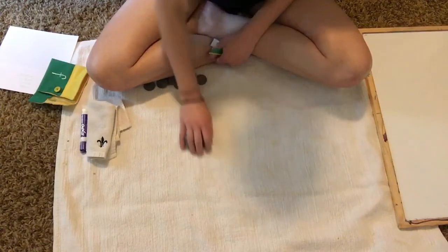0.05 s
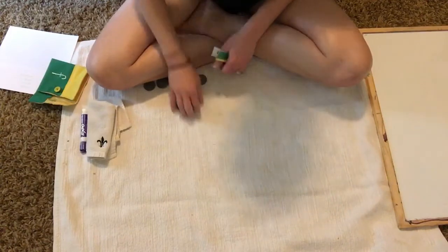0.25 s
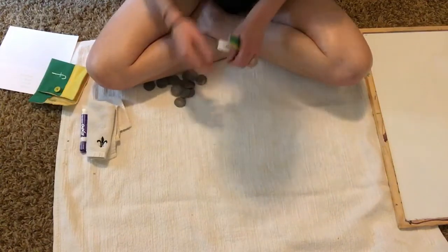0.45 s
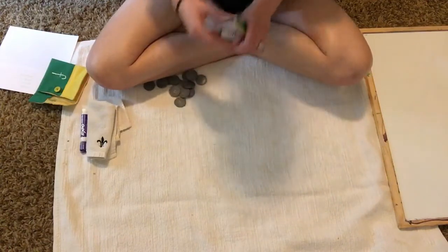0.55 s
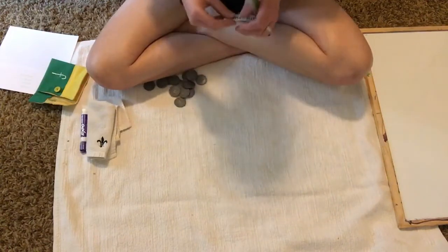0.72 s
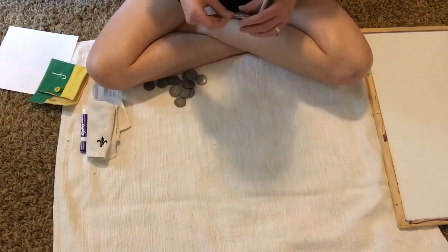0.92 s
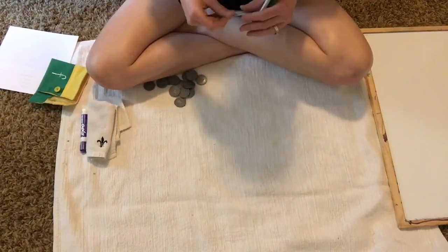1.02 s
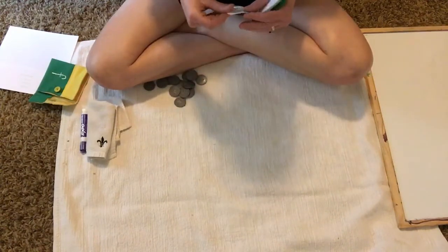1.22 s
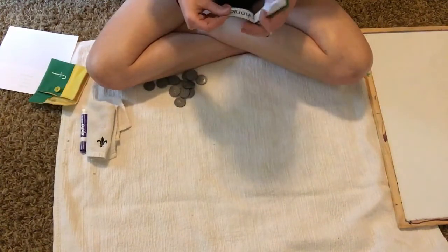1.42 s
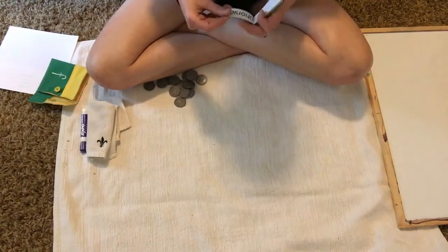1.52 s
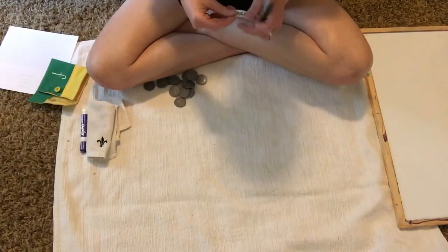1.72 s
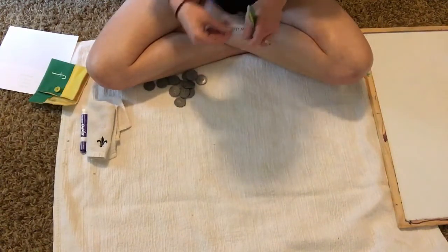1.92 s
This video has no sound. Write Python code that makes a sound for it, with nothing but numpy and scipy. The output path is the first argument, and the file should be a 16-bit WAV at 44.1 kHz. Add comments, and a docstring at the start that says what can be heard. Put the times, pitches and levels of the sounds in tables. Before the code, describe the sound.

Coins clink and jostle as a hand sweeps them across a towel, then clash into a small pile and settle. Fingers faintly slide over and tap a small paper packet in a quiet furnished room.

```python
"""Coins clink as a hand sweeps them across a towel on carpet; they clash into a small pile and settle.
Each contact clicks and rings the coins' modes, choked by neighbours and fingers. Then the fingers
slide and tap a small paper packet: its fibres hiss, its edge rasps in tiny slips, taps ring it briefly.
Hand and body bump softly, over the steady air of a quiet furnished room."""
import sys
import numpy as np
from scipy import signal
from scipy.fft import rfft, irfft, next_fast_len
from scipy.io import wavfile
from scipy.ndimage import map_coordinates

SR = 44100
rng = np.random.default_rng(int(sys.argv[2]) if len(sys.argv) > 2 else 0)


def persist_wave(psi):
    """Save psi, clipped to +-1, as 16-bit WAV."""
    counts = np.round(np.clip(psi, -1, 1) * 32767).astype(np.int16)
    wavfile.write(sys.argv[1], SR, np.atleast_2d(counts).T)


N = 85995
T = np.arange(N) / SR
RING_T = T[:SR // 3]


def amp(db):
    """Decibels to gain."""
    return 10 ** (np.asarray(db) / 20)


def unit_rms(x):
    """Scale to rms 1."""
    return x / np.sqrt(np.mean(x ** 2) + 1e-20)


def log_interp(points, hz):
    """Interpolate (Hz, value) points on a log frequency axis."""
    point_hz, values = np.transpose(points)
    return np.interp(np.log(hz + 1), np.log(point_hz + 1), values)


def filtered(x, response):
    """Apply a gain given as a function of Hz."""
    size = next_fast_len(N + SR // 4)
    return irfft(rfft(x, size) * response(np.fft.rfftfreq(size, 1 / SR)), size)[:N]


def noise(spectrum):
    """Coloured noise of rms 1."""
    return unit_rms(filtered(rng.standard_normal(N), lambda hz: amp(log_interp(spectrum, hz))))


def ramp(t, rise_s):
    """Linear rise from 0 to 1."""
    return np.clip(t / rise_s, 0, 1)


def decay(t, t60_s):
    """Silent before zero, then exponential decay."""
    return (t >= 0) * np.exp(-np.log(1000) * np.maximum(t, 0) / t60_s)


def add(out, start_s, x):
    """Mix x into out at start_s."""
    i = max(0, round(start_s * SR))
    out[i:i + len(x)] += x[:N - i]


# Cloth friction spectrum. Each row: frequency in Hz, relative level in dB.
TOWEL_SPECTRUM = [(300, 2.5), (800, -10), (1500, -2), (2500, -12), (16000, -16)]
def towel_sweep(level_db=-63.5, lift_s=0.332, fade_s=0.21):
    """The hand brushes the towel until it lifts."""
    return amp(level_db) * (1 - ramp(T - lift_s, fade_s)) * noise(TOWEL_SPECTRUM)


UPPER_HZ, RING_RISE_S = 7000, 0.000315
def ring(modes, upper_db=0, scatter_db=2.5, lower_detune=0.0075, upper_detune=0.025):
    """One blow excites damped modes, each scattered in pitch and strength."""
    hz, db, t60_s = np.transpose(modes)
    upper = hz > UPPER_HZ
    pitch, strength, polarity = rng.standard_normal((3, len(hz)))
    hz = hz * (1 + np.where(upper, upper_detune, lower_detune) * pitch)
    gain = amp(db + scatter_db * strength)
    gain = np.sign(polarity) * gain / np.linalg.norm(gain) * amp(upper_db * upper)
    tones = np.sin(2 * np.pi * hz[:, None] * RING_T) * decay(RING_T, t60_s[:, None])
    return 2 * gain @ tones * ramp(RING_T, RING_RISE_S)


# Coin modes. Each row: frequency in Hz, relative level in dB, unchoked t60 in seconds.
COIN_RESONANCES = [(4700, -4.5, .06), (4930, -2, .08), (5028, -2, .16), (5250, -2, .09), (5380, -5, .07),
                   (8530, -6, .07), (8900, -6, .06), (9450, -5, .05), (9780, -3, .065), (10236, -4, .045),
                   (10830, -2, .05), (14200, -5, .035), (14700, -7, .035)]
def coin_ring(start_s, upper_db=0, let_go_s=0.255, held_db=-24, free_db=-2.5, choke_t60_s=0.0221):
    """Neighbours choke most of a coin's ring; more rings on once the fingers let go."""
    free_ratio = amp(held_db if start_s < let_go_s else free_db)
    damping = (decay(RING_T, choke_t60_s) + free_ratio) / (1 + free_ratio)
    return ring(COIN_RESONANCES, upper_db) * damping


# Coin contacts. Each row: start in seconds, ring level in dB, upper-mode boost in dB, click level in dB.
COIN_CONTACTS = [(.001, -51, -6, -68.5), (.0805, -50.5, -2, -48), (0.1601, -44.5, 4.5, -46),
                 (.189, -55.5, 1.5, -45), (.221, -54, 11.5, -42.5), (.2415, -39.5, -2, -39.5),
                 (.2603, -36, -19.5, -41.5), (.268, -45.5, 2, -41.5), (.2805, -47, 9.5, -48.5),
                 (.289, -44.5, 11, -33.5), (.305, -39.5, 7.5, -37.5), (.313, -48.5, 6, -34.5),
                 (.32, -35.5, 2.5, -25), (.3233, -27.5, -6, -24.5), (.327, -33, 4.5, -34),
                 (.3455, -48, 16, -45.5), (.366, -48, 14.5, -50.5), (.381, -41, -2, -50.5),
                 (.391, -43.5, 1, -42.5)]
# Contact click spectrum. Each row: frequency in Hz, relative level in dB.
CLICK_SPECTRUM = [(850, -36.5), (1400, -8.5), (2150, -27), (3400, -8), (6100, -8), (7500, -6), (10000, -5),
                  (11800, -10.5), (15000, -2.5)]
def clinks(click_rise_s=0.00141, click_t60_s=0.0248):
    """Coin strikes coin: a noise click and a metallic ring."""
    rings, click_power = np.zeros((2, N))
    for start_s, ring_db, upper_db, click_db in COIN_CONTACTS:
        add(rings, start_s, amp(ring_db) * coin_ring(start_s, upper_db))
        t = T - start_s
        click_power += (amp(click_db) * ramp(t, click_rise_s) * decay(t, click_t60_s)) ** 2
    return rings + noise(CLICK_SPECTRUM) * np.sqrt(click_power)


# Jostling envelope. Each row: time in seconds, level in dB.
JOSTLE_LEVELS = [(.005, -57.5), (.04, -68.5), (.066, -59), (.1, -73), (.125, -64), (.158, -56.5), (.2, -72),
                 (.25, -58), (.28, -45), (.3, -54), (.335, -48), (.362, -43), (.395, -53), (.48, -73.5)]
# Rim-on-rim spectrum. Each row: frequency in Hz, relative level in dB.
RIM_SPECTRUM = [(800, -61), (1400, -7.5), (2200, -15.5), (4700, -1), (6100, -9), (7500, 3.5), (9200, -16.5),
                (12000, -5.5), (15000, -16)]
def jostle(touches_per_s=890, segments=36, ring_over_click_db=1):
    """Sliding coins touch at random; in each segment other rims meet."""
    out = np.zeros(N)
    scrape = noise(RIM_SPECTRUM)
    level = amp(np.interp(T, *np.transpose(JOSTLE_LEVELS)))
    impulses = (rng.random(N) < touches_per_s / SR) * np.sign(rng.standard_normal(N))
    touches = level * unit_rms(impulses)
    click_envelope = ramp(RING_T, RING_RISE_S) * decay(RING_T, t60_s=0.009)
    edges_s = np.linspace(0, JOSTLE_LEVELS[-1][0], segments + 1)
    for start_s, end_s in zip(edges_s, edges_s[1:]):
        click = np.roll(scrape, rng.integers(N))[:len(RING_T)] * click_envelope
        contact = unit_rms(click) + amp(ring_over_click_db) * unit_rms(coin_ring(start_s))
        segment = touches[round(start_s * SR):round(end_s * SR)]
        add(out, start_s, signal.fftconvolve(segment, contact / np.linalg.norm(contact)))
    return out


# Blows on the pile. Each row: start in seconds, level in dB.
PILE_BLOWS = [(.063, -57.5), (0.161, -57.5), (.32, -37), (0.3228, -34), (0.3457, -45)]
# Pile modes. Each row: frequency in Hz, relative level in dB, t60 in seconds.
PILE_MODES = [(313.6, -11, 0.0285), (1243, -12.5, 0.059), (1525, -7.5, 0.018), (1814.3, -11, 0.0352),
              (2644.6, 0.5, 0.0186), (2914, 0, 0.0264), (3225, -3, 0.0235), (4190, -1, 0.0135)]
def pile_clashes():
    """Blows clack through the whole pile."""
    out = np.zeros(N)
    for start_s, db in PILE_BLOWS:
        add(out, start_s, amp(db) * ring(PILE_MODES))
    return out


# Small coin's modes. Each row: frequency in Hz, relative level in dB, t60 in seconds.
SMALL_COIN_MODES = [(5656, -7.5, 0.0253), (6820, -9.5, 0.0254)]
def small_coin_chink(start_s=0.2225, level_db=-48.5):
    """One small coin is nudged and rings briefly."""
    out = np.zeros(N)
    add(out, start_s, amp(level_db) * ring(SMALL_COIN_MODES))
    return out


# Soft bumps. Each row: start in seconds, level in dB.
BODY_BUMPS = [(0.255, -58), (0.323, -57), (1.586, -53.5), (1.831, -60.5)]
# Bump spectrum. Each row: frequency in Hz, relative level in dB.
BUMP_SPECTRUM = [(25, -19), (60, 2.5), (130, -11), (300, -15.5), (3000, -72.5)]
def body_bumps(rise_s=0.000625, t60_s=0.202):
    """Hand and body bump softly: bursts of low noise."""
    envelope = sum(amp(db) * ramp(T - start_s, rise_s) * decay(T - start_s, t60_s)
                   for start_s, db in BODY_BUMPS)
    return envelope * noise(BUMP_SPECTRUM)


# Paper strokes. Each row: start, rise, hold and 30 dB fall in seconds, hiss and rasp levels in dB.
PAPER_STROKES = [(0.587, 0.0193, 0.00225, .025, -66.5, -91.5), (0.741, 0.0283, 0.0164, 0.036, -66, -77.5),
                 (0.788, 0.0052, 0.0065, 0.0825, -58.5, -83.5), (0.873, 0.0396, .02, 0.3, -65.5, -72.5),
                 (0.992, 0.0426, 0.0069, 0.0414, -66.5, -68), (1.171, 0.0216, 0.018, 0.137, -62.5, -71),
                 (1.266, 0.0267, 0.122, 0.05, -70.5, -85)]
# Paper friction spectrum. Each row: frequency in Hz, relative level in dB.
HISS_SPECTRUM = [(1000, -13), (4000, -15), (5600, -7.5), (13500, -7)]
# Paper edge modes. Each row: frequency in Hz, relative level in dB, t60 in seconds.
EDGE_MODES = [(2927, -5.5, 0.0098), (3364, -8, 0.022), (3852, 0, 0.0125), (5060, -3, .008)]
def paper_slides(fibres_per_s=460, fibre_db=1.5, slips_per_s=650, crisp_hz=11520, crisp_ref_db=-56):
    """Sliding paper hisses, roughened by its fibres; its edge rasps in tiny slips."""
    hiss = noise(HISS_SPECTRUM)
    roughness = map_coordinates(rng.standard_normal(N), [T * fibres_per_s])
    hiss *= unit_rms(amp(fibre_db * roughness))
    treble = filtered(hiss, lambda hz: hz ** 8 / (hz ** 8 + crisp_hz ** 8.))
    slips = (rng.random(N) < slips_per_s / SR) * rng.standard_normal(N)
    rasp = unit_rms(signal.fftconvolve(slips, ring(EDGE_MODES))[:N])
    out = np.zeros(N)
    for start_s, rise_s, hold_s, fall_s, hiss_db, rasp_db in PAPER_STROKES:
        t = T - start_s
        swell = np.sin(np.pi / 2 * ramp(t, rise_s)) ** 2
        release = decay(np.maximum(t - rise_s - hold_s, 0), 2 * fall_s)
        crispness = amp(hiss_db - crisp_ref_db) ** 2  # harder strokes are crisper
        out += swell * release * (amp(hiss_db) * (hiss + crispness * treble) + amp(rasp_db) * rasp)
    return out


# Finger taps. Each row: start in seconds, tone level in dB, pitch in Hz, t60 in seconds, tick in dB.
FINGER_TAPS = [(.751, -61.5, 1048, 0.0383, -80), (1.5805, -56, 2107, 0.052, -64.5),
               (1.596, -64.5, 2163, 0.091, -72), (1.932, -60.5, 1424, 0.034, -61.5)]
# Fingertip tick spectrum. Each row: frequency in Hz, relative level in dB.
TICK_SPECTRUM = [(900, -1), (1900, -12), (2700, 1), (3700, -1.5), (4800, -14)]
def packet_taps(overtone_ratio=1.1, overtone_db=-11.5, tick_t60_s=0.065):
    """A fingertip ticks on the packet and rings two of its modes."""
    out = np.zeros(N)
    tick = noise(TICK_SPECTRUM)
    for start_s, tone_db, hz, t60_s, tick_db in FINGER_TAPS:
        t = T - start_s
        phase = 2 * np.pi * hz * t
        tone = np.sin(phase) + amp(overtone_db) * np.sin(overtone_ratio * phase)
        out += amp(tone_db) * tone * decay(t, t60_s) + amp(tick_db) * tick * decay(t, tick_t60_s)
    return out


# Room decay. Each row: frequency in Hz, t60 in seconds.
ROOM_DECAY = [(1400, 0.281), (15000, 0.1995)]
def room_reverb(x, level_db=-8, rise_s=0.00152):
    """A short diffuse tail whose treble dies first."""
    hz, t, bands = signal.stft(rng.standard_normal(SR // 2), SR, nperseg=256)
    tail = signal.istft(bands * decay(t, log_interp(ROOM_DECAY, hz)[:, None]), SR)[1]
    tail *= ramp(T[:len(tail)], rise_s)
    return amp(level_db) * signal.fftconvolve(x, tail / np.linalg.norm(tail))[:N]


# Room air spectrum. Each row: frequency in Hz, relative level in dB.
AIR_SPECTRUM = [(70, 2.5), (150, 0), (300, -4.5), (500, -10), (1500, -14), (4000, -19.5), (15500, -26)]
def room_air(level_db=-65.5):
    """Steady low noise behind everything."""
    return amp(level_db) * noise(AIR_SPECTRUM)


def scene():
    """Coins and paper with reverb, plus towel, bumps and air; mono."""
    coins = clinks() + jostle() + pile_clashes() + small_coin_chink()
    direct = coins + paper_slides() + packet_taps()
    return (direct + room_reverb(direct) + towel_sweep() + body_bumps() + room_air())[None]


LOW_CUT_HZ, TOP_HZ = 55, 15850
def record(dry):
    """The microphone sheds deep bass and passes nothing above TOP_HZ."""
    return filtered(dry[0], lambda hz: (hz < TOP_HZ) * hz ** 4 / np.hypot(hz ** 4, LOW_CUT_HZ ** 4))[None]


dry = scene()
out = record(dry)
persist_wave(out)
```